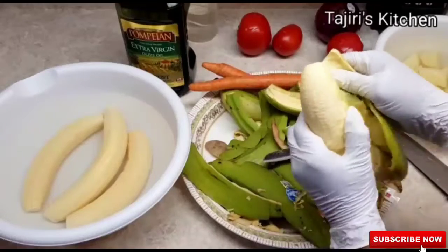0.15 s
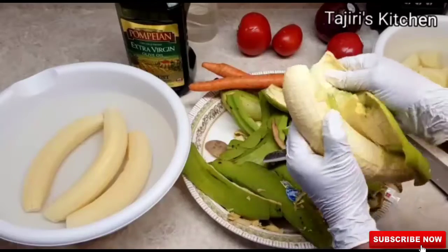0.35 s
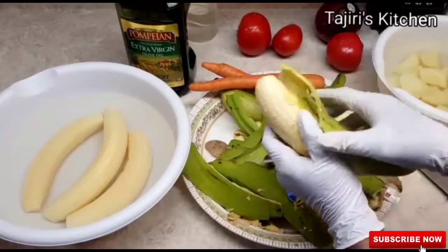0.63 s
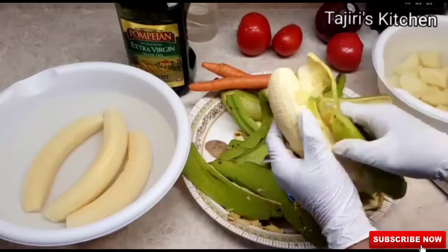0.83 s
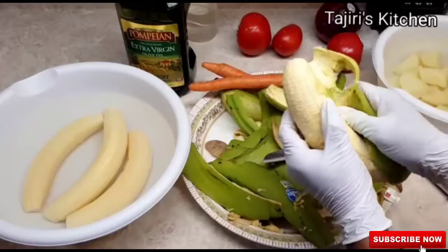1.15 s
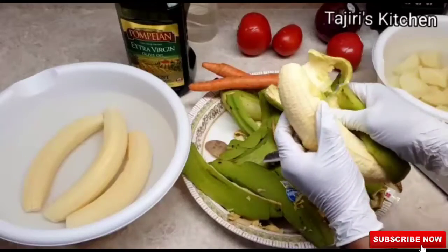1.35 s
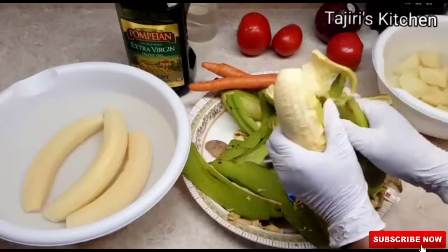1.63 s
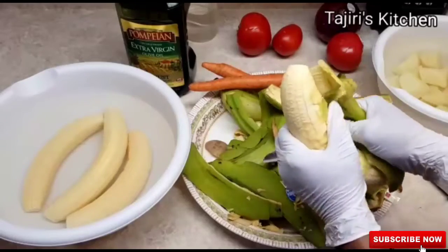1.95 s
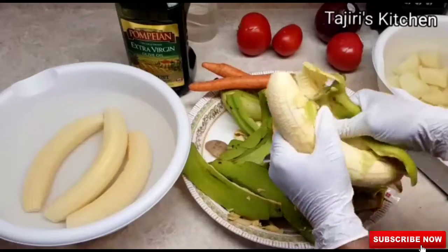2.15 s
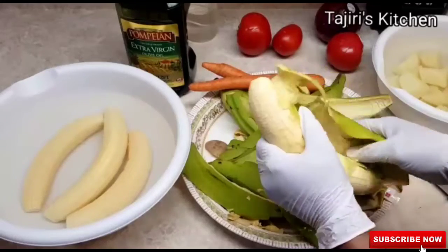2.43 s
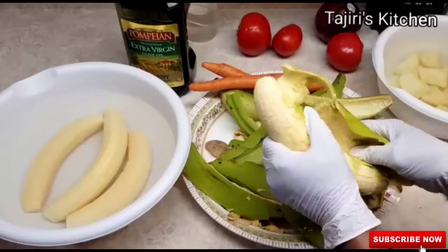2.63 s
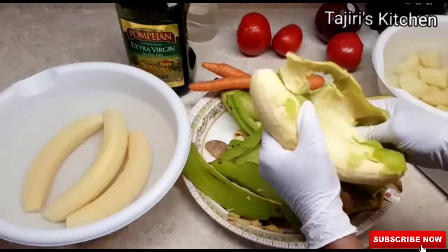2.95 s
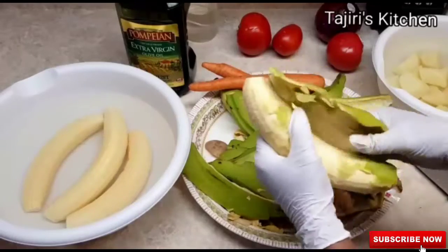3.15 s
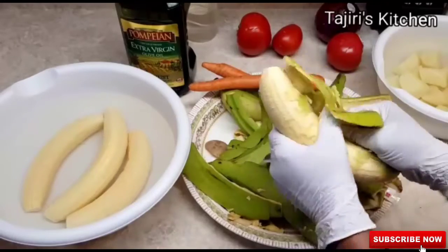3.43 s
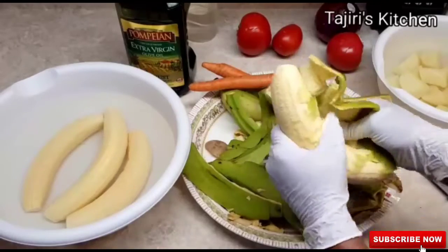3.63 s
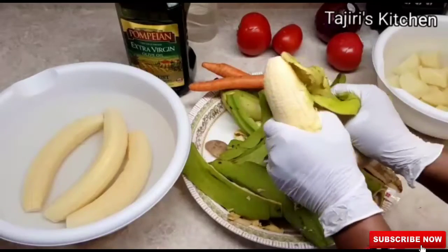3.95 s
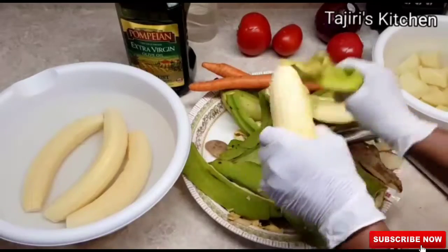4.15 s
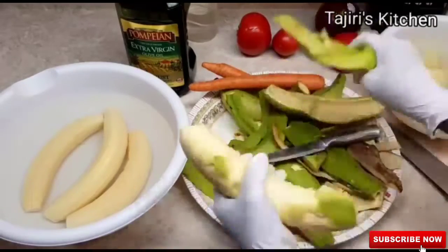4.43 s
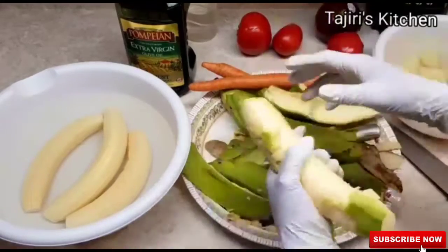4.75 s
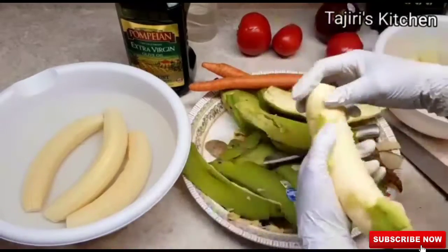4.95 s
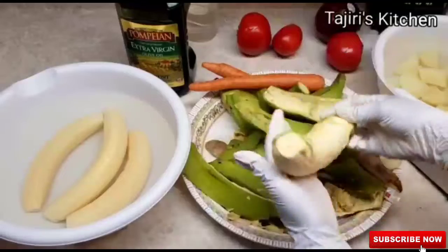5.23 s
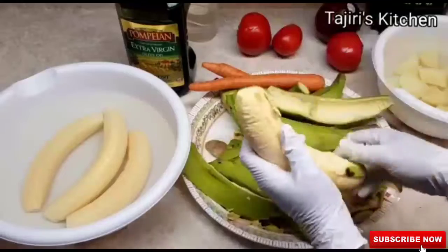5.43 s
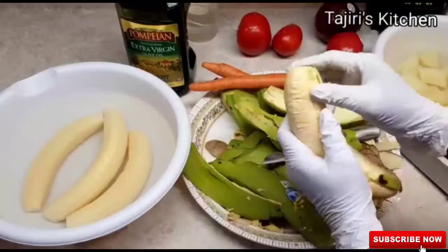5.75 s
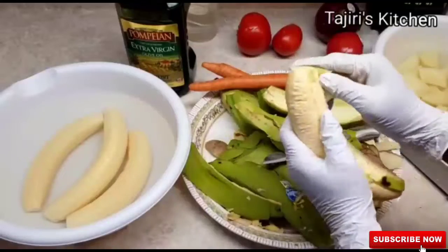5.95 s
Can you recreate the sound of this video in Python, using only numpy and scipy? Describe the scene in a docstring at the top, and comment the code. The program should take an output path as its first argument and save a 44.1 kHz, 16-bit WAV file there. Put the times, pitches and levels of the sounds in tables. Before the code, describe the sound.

Gloved hands tear the thick skin from a green plantain, close by and slightly right of centre, in a small kitchen with short echoes. A sharp snap and crackling rip come at about 0.1 seconds, followed by light glove rustle. More clusters of slightly hollow cracks and tearing fibres arrive around 1.2 to 1.4 seconds and 2.0 to 2.2 seconds. The loudest, crunchiest tear builds from 2.8 to 3.0 seconds. Loose peel then patters faintly on a plate, and further snaps with rubbing come at 3.6 and 4.2 seconds. Soft, low hand bumps follow until about 4.7 seconds. The rest is quieter, with gloves slipping and rustling on the fruit, a few tiny ticks and a brief brighter rub near 6 seconds. A wavering low hum, an uneven rumble and faint room air lie underneath throughout.

```python
"""The thick skin of a green plantain is pulled off by gloved hands, over a plate in a small kitchen.
Each pull tears fibres in a crackling run of tiny clicks; the stiff skin snaps and the pull slackens.
The gloves rustle and rub on the fruit, and loose peel knocks softly against the plate.
The skin's sounds ring in the hollow of peel, hands and plate, and the kitchen adds short echoes.
Underneath lie a low hum, an uneven rumble, soft bumps of the hands and faint room air."""
import sys
import numpy as np
from scipy import signal
from scipy.fft import rfft, irfft, next_fast_len
from scipy.io import wavfile
from scipy.ndimage import uniform_filter1d

SR = 44100
rng = np.random.default_rng(int(sys.argv[2]) if len(sys.argv) > 2 else 0)


def file_out(sig):
    """Save sig as 16-bit WAV at sys.argv[1]."""
    # one column per channel
    cols = np.atleast_2d(sig).T
    # limit, then scale
    lim = np.clip(cols, -1, 1)
    pcm = np.round(lim * 32767).astype(np.int16)
    wavfile.write(sys.argv[1], SR, pcm)


N = 269010
TIME = np.arange(N) / SR

# Levels in the tables are relative: the functions turn them up or down further.
# pulls on the skin: start t/s, length/s, rustle level/dB, peel level/dB, swell from start to end/dB
SKIN_PULLS = [(0.0, 0.12, -45, -73, -9), (0.127, 0.059, -31.5, -36, -10), (0.33, 0.065, -40, -45, 5.5),
              (0.562, 0.11, -56, -68.5, -11), (0.764, 0.14, -55.5, -73, -9), (0.948, 0.011, -49, -62, -2),
              (1.089, 0.12, -51.5, -57.5, 6.5), (1.225, 0.024, -40.5, -36.5, 8),
              (1.275, 0.15, -36, -39.5, -8), (1.448, 0.1, -53, -61, -4), (1.576, .21, -49, -64, -4),
              (1.865, 0.036, -50, -69, 8), (1.905, 0.2, -46.5, -56.5, -9),
              (2.042, 0.21, -42.5, -44.5, -14.5), (2.29, 0.12, -56.5, -56.5, -3),
              (2.414, 0.084, -45.5, -51, 3), (2.692, .07, -53, -77, -2), (2.783, 0.26, -43, -47.5, -10.5),
              (2.986, 0.021, -29, -28, 6.5), (3.033, 0.16, -58, -62, 4), (3.186, 0.069, -54.5, -59.5, 9),
              (3.389, 0.042, -48, -53.5, 3), (3.513, 0.066, -56.5, -65, 3),
              (3.597, 0.087, -38.5, -45, -4.5), (3.68, 0.073, -51, -52.5, -6),
              (3.814, 0.042, -52, -63.5, 7), (3.867, 0.257, -44, -53, 10.5),
              (4.123, 0.11, -41.5, -43.5, 10), (4.22, 0.048, -30, -32, -6), (4.652, 0.11, -57, -65, -6),
              (4.962, 0.17, -52, -68, 18), (5.198, 0.068, -56.5, -65, -5), (5.405, 0.14, -60.5, -72, 15),
              (5.814, 0.1, -64, -75.5, 2), (5.93, 0.087, -50, -71, 8.5), (6.071, .04, -41.5, -53, -1)]
# snaps of the skin: t/s, crack level/dB, crack f/Hz, splinter level/dB, splinter decay/s
SKIN_SNAPS = [(0.0395, -44.5, 2960, -31, 0.0008), (0.11, -59, 2520, -33, 0.0025),
              (0.1224, -24, 1870, -19, .006), (0.1859, -35, 2020, -33, 0.0013),
              (0.3216, -56, 1900, -38.5, .0035), (0.396, -36, 1730, -40, .001),
              (0.556, -75, 2000, -42.5, 0.0015), (0.948, -62, 2000, -37, 0.0034),
              (1.2118, -39.5, 2190, -29.5, 0.00072), (1.235, -33, 1610, -28.5, 0.0015),
              (1.2688, -37, 2000, -27, .003), (1.3056, -29.5, 1480, -32, 0.0011),
              (1.3358, -28, 1660, -30, 0.00059), (1.3751, -41, 1760, -41, .0013),
              (1.4101, -43.5, 2020, -38, .0008), (1.4598, -44, 2170, -33.5, 0.0014),
              (2.0276, -39, 2230, -31, 0.00048), (2.0426, -16, 2320, -23.5, 0.00026),
              (2.052, -31, 1920, -42, .001), (2.0999, -27.5, 1790, -34.5, .001),
              (2.1393, -38.5, 1840, -47, .001), (2.1787, -27, 2200, -31, 0.0015),
              (2.215, -52, 2430, -33.5, 0.00051), (2.2226, -55, 2040, -40, .0006),
              (2.6923, -64, 1640, -40.5, 0.00041), (2.732, -60, 1900, -40.5, 0.001),
              (2.7875, -31.5, 1450, -32.5, 0.001), (2.8264, -28.5, 2250, -24, 0.0062),
              (2.8431, -34, 1540, -44, .001), (2.89, -46, 2080, -33, .001),
              (2.9043, -26, 1620, -29, 0.0015), (2.9742, -28, 1910, -20, 0.00091),
              (2.9807, -24, 1750, -52.5, .0006), (2.9903, -27, 2110, -19, .0015),
              (3.0038, -21.5, 1550, -22, 0.0046), (3.233, -46.5, 1700, -42, .0016),
              (3.568, -58, 1800, -50, .001), (3.597, -52, 2090, -39, .0013),
              (3.6432, -28.5, 1780, -24, 0.013), (3.7324, -50.5, 1890, -44, .0007),
              (4.2061, -50, 2220, -29, .003), (4.2209, -27.5, 1760, -26.5, 0.006),
              (4.6672, -63, 2240, -46.5, .0008), (4.981, -82, 1620, -44.5, 0.0014),
              (5.0983, -62, 2520, -42, .0012), (6.0618, -56.5, 1870, -32, 0.0027)]
# skin thickness, heard as how much a snap crunches compared with its crack: t/s, level/dB
SKIN_THICKNESS = [(0.12, -22), (1.25, -4), (2.15, -16), (2.8, -3), (2.91, 3), (3.0, -1.5), (3.64, -5),
                  (4.22, -14)]
# tone of coarse fibres crunching: f/Hz, level/dB
CRUNCH_SPECTRUM = [(120, -24.5), (280, -7), (400, -8.5), (600, -3.5), (900, 1.5), (1200, 1.5),
                   (1700, -12.5), (3000, -41.5)]
# tone of the crackle as the peel lifts: f/Hz, level/dB
PEEL_SPECTRUM = [(500, -18.5), (1000, -11), (1400, 0.5), (1900, 1.5), (2500, 0), (3300, -5), (5000, -6),
                 (10000, -40.5)]
# tone of the sharp bite of a hard pull: f/Hz, level/dB
BITE_SPECTRUM = [(1200, -8), (2400, -10.5), (3300, 5.5), (4500, 1.5), (6000, -2), (9000, -15.5),
                 (16000, -23)]
# tone of the fine rustle: f/Hz, level/dB
RUSTLE_SPECTRUM = [(1000, -28), (2500, -6.5), (3500, -3), (4700, 0), (6500, 1.5), (9000, -1), (12000, 0.5),
                   (16000, -2.5)]
# gloves shifting on the fruit between pulls: t/s, level/dB
GLOVE_GRIP = [(0, -66), (0.5, -67), (0.85, -63.5), (3.3, -64), (4.5, -65), (4.87, -66.5), (5.3, -62.5),
              (5.55, -64), (5.65, -76.5), (6.1, -83)]
# glove and peel slipping on the fruit: middle t/s, length/s, level/dB, f/Hz, width/Hz
SLIPS = [(0.066, 0.17, -45.5, 3820, 1300), (0.11, 0.0077, -18.5, 3950, 1300),
         (0.172, 0.16, -45, 3840, 1600), (0.157, 0.064, -37, 1100, 500), (0.558, 0.07, -49, 5650, 1200),
         (0.775, 0.15, -55.5, 5560, 1200), (0.87, 0.21, -55, 1740, 500), (0.944, 0.017, -45.5, 5040, 700),
         (1.64, 0.13, -45.5, 4340, 900), (1.949, 0.18, -41, 2130, 710), (2.34, 0.087, -59, 2280, 500),
         (3.574, 0.13, -43.5, 1820, 450), (3.614, 0.067, -32.5, 1700, 550), (3.643, 0.046, -40, 382, 248),
         (3.867, 0.19, -46.5, 9600, 4060), (4.227, 0.1, -37, 1060, 450), (4.699, 0.12, -56.5, 2880, 900),
         (5.097, 0.081, -56, 5400, 2000), (5.116, 0.46, -65, 1580, 100), (5.155, 0.26, -55, 2500, 405),
         (5.968, 0.15, -48, 6750, 1200), (6.075, 0.04, -36, 11700, 4500)]
# loose peel knocking on the plate: t/s, level/dB
PEEL_KNOCKS = [(3.209, -57), (3.404, -53.5), (3.515, -60.5), (4.691, -58)]
# ringing of the hollow of peel, hands and plate: f/Hz, width/Hz, level/dB over the direct sound
HOLLOW_RINGS = [(426, 20, 4), (745, 24, -5), (545, 31, -8), (1190, 140, -6), (1440, 200, -13),
                (2353, 66, -5)]
# how long the kitchen's echoes take to fade by 60 dB: f/Hz, t/s
ECHO_FADE = [(200, 0.1), (800, 0.27), (2000, 0.28), (6000, 0.27), (15000, 0.23)]
# how alike the echoes are left and right: f/Hz, likeness (1 = the same)
ECHO_LIKENESS = [(100, 1), (400, 0.61), (800, 0.36), (1500, 0), (3000, 0.11), (16000, 0)]
# loudness of the low hum: t/s, level/dB
HUM_LEVEL = [(0, -56), (0.3, -40.5), (0.55, -57), (1.1, -46), (1.65, -42), (1.9, -46.5), (2.1, -64),
             (2.4, -47), (2.7, -63.5), (3.35, -54.5), (3.6, -64), (3.8, -46.5), (3.95, -51), (4.25, -49),
             (4.9, -51), (5.45, -56), (5.7, -42.5), (6.1, -50)]
# loudness of the rumble: t/s, level/dB
RUMBLE_LEVEL = [(0, -48.5), (0.7, -52.5), (1.3, -49.5), (2.9, -58.5), (3.6, -56.5), (4.3, -57), (4.9, -54),
                (5.7, -53), (6.1, -51)]
# tone of the rumble: f/Hz, level/dB
RUMBLE_SPECTRUM = [(25, -21.5), (36, -13), (48, -3.5), (65, 2), (80, 3), (100, 2.5), (130, -7.5),
                   (200, -17), (400, -46.5)]
# soft bumps of the hands: t/s, peak level/dB, f/Hz
HAND_BUMPS = [(1.598, -33.5, 58), (3.032, -43, 88), (4.232, -35, 61.4), (4.484, -34, 62),
              (4.533, -36.5, 63.6), (4.728, -32.5, 75)]
# tone of the room air: f/Hz, level/dB
AIR_SPECTRUM = [(60, 4.5), (150, -11), (240, 1), (330, -10), (500, -14.5), (1000, -17.5), (2500, -23.5),
                (6000, -41.5), (16000, -42)]


def pulling(attack_s=0.011, release_s=0.0085, after_snap_s=0.0046, slack_db=-4, slack_s=0.049):
    """Gains of crunch, peel and rustle: pulls grip and let go; snaps free fibres and slacken the pull."""
    peel, rustle, freed, slack = np.zeros((4, N))
    for s, length, rustle_db, peel_db, swell_db in SKIN_PULLS:
        age = TIME - s
        swell = from_db(swell_db * (np.clip(age / length, 0, 1) - .5))
        fade = np.exp(np.minimum(age, 0) / attack_s - np.maximum(age - length, 0) / release_s)
        power = (swell * fade) ** 2
        rustle += from_db(rustle_db) ** 2 * power
        peel += from_db(peel_db) ** 2 * power
    for s, crack_db, *_ in SKIN_SNAPS:
        at = int(s * SR)
        age = TIME[:N - at]
        freed[at:] += (from_db(crack_db) * np.exp(-age / after_snap_s)) ** 2   # fibres go on breaking
        slack[at:] = np.exp(-age / slack_s)
    tension = from_db(slack_db * slack) ** 2
    crunch = from_db(-19.5) ** 2 * peel + level(SKIN_THICKNESS) ** 2 * freed
    peel = tension * peel + from_db(-6.5) ** 2 * freed
    rustle = tension * rustle + from_db(-22) ** 2 * freed + level(GLOVE_GRIP) ** 2
    return np.sqrt([crunch, peel, rustle])


def tearing(crunch_gain, peel_gain, rustle_gain):
    """A few coarse fibres crunch and more crackle as the skin lifts; a hard pull adds a sharp bite."""
    coarse = clicks(per_s=300, spread_db=4, clump_db=-4, clumps_per_s=86)
    medium = clicks(per_s=900, spread_db=3.5, clump_db=2.5, clumps_per_s=240)
    sharp = clicks(per_s=1500, spread_db=6.5, clump_db=17.5, clumps_per_s=130)
    hardness = rustle_gain / (rustle_gain + from_db(-30))
    crunch = crunch_gain * shape_tone(coarse, CRUNCH_SPECTRUM)
    peel = peel_gain * shape_tone(medium, PEEL_SPECTRUM)
    bite = hardness * rustle_gain * shape_tone(sharp, BITE_SPECTRUM)
    return from_db(-7.5) * crunch + from_db(-3) * peel + from_db(-2) * bite


def snapping(ring_cycles=1.08, gain_db=-3):
    """Each snap makes the stiff skin swing once or twice, amid a spray of splinters."""
    lead = SR // 100   # the first fibres give way just before the skin does
    t = np.arange(-lead, SR // 30) / SR
    age = np.maximum(t, 0)
    cracks, sprays = np.zeros((2, N + len(t)))
    for s, crack_db, hz, spray_db, spray_s in SKIN_SNAPS:
        crack = np.sin(2 * np.pi * hz * age) * np.exp(-age * hz / ring_cycles)
        splinters = rng.standard_normal(len(t)) * rng.exponential(1, len(t))
        spray = splinters * np.exp(-np.abs(t) / spray_s)
        at = int(s * SR) - lead
        cracks[at:at + len(t)] += from_db(crack_db) * crack / np.linalg.norm(crack)
        sprays[at:at + len(t)] += from_db(spray_db) * spray / np.linalg.norm(spray)
    cracks = signal.sosfilt(signal.butter(2, 480, "high", fs=SR, output="sos"), cracks + 1e-18)
    sprays = signal.sosfilt(signal.butter(1, 3000, "high", fs=SR, output="sos"), sprays + 1e-18)
    return from_db(gain_db) * np.sqrt(SR / 200) * (cracks + sprays)[:N]


def rustling(gain):
    """The finest breaks blur into a rustle; each slip of a glove is a run of catches with its own pitch."""
    fine = clicks(per_s=14000, spread_db=3.5, clump_db=1.5, clumps_per_s=160)
    rustle = from_db(-3.5) * gain * shape_tone(fine, RUSTLE_SPECTRUM)
    catches = clicks(per_s=2000, spread_db=6, clump_db=4, clumps_per_s=77)
    for s, length, db, hz, width in SLIPS:
        span = slice(*np.searchsorted(TIME, [s - length / 2, s + length / 2]))
        swell = np.cos(np.pi * (TIME[span] - s) / length)
        rub = ring(ring(catches[span], hz, width), hz, 2 * width)
        rustle[span] += from_db(db - 8) * swell * rms_one(rub)
    return rustle


def knocking(decay_s=0.013):
    """A limp strip of peel meets the plate with a short, dull patter."""
    patter = sum(from_db(db) * (TIME > s) * np.exp(-np.abs(TIME - s) / decay_s) for s, db in PEEL_KNOCKS)
    return patter * rms_one(ring(rng.standard_normal(N), hz=467, width_hz=630))


def from_the_right(x, pan_db=0.2, lag_s=0.0001):
    """The hands work right of centre: the left side hears them later and softer."""
    size = next_fast_len(N + SR // 10)
    hz = np.arange(size // 2 + 1) * SR / size
    late = irfft(rfft(x, size) * np.exp(-2j * np.pi * hz * lag_s), size)[:N]
    return np.array([late * from_db(-pan_db), x * from_db(pan_db)])


def kitchen(x, spots=6):
    """The sound wanders between spots on the moving fruit, each with its own echoes."""
    shares = from_db(12 * np.array([drift(45) for _ in range(spots)]))
    shares /= np.linalg.norm(shares, axis=0)
    return sum(signal.fftconvolve((x * share)[None], echoes(), axes=1)[:, :N] for share in shares)


def echoes(near_db=3, near_s=0.0053, far_db=-4):
    """Echoes of one spot: counter and bowls scatter the treble at once; the walls add a short tail."""
    t = np.arange(SR // 3) / SR
    edges, response = np.geomspace(80, 17000, num=13), 0
    noise = rng.standard_normal((2, 2, len(t)))
    near = np.exp(-t / near_s) * (t > .0007)
    for k, (low, high) in enumerate(zip(edges, edges[1:])):
        hz = np.sqrt(low * high)
        far = from_db(-60 * t / at_hz(ECHO_FADE, hz)) * (t > .006)
        scatter = from_db(near_db) * hz / (hz + 500)   # long waves pass round small things
        decay = np.hypot(scatter * near / np.linalg.norm(near), from_db(far_db) * far / np.linalg.norm(far))
        band = signal.butter(2, [low, high], "band", fs=SR, output="sos")
        mid, side = signal.sosfilt(band, noise[k % 2] * decay)
        alike = at_hz(ECHO_LIKENESS, hz)
        response += np.sqrt((1 + alike) / 2) * mid + np.sqrt((1 - alike) / 2) * side * [[1], [-1]]
    return response


def hand_bumps(length_s=0.023):
    """Each bump of the hands is a low note that swells and dies quickly."""
    bumps = np.zeros(N)
    for s, db, hz in HAND_BUMPS:
        age = np.clip(TIME - s, 0, 1)
        rise = 2 * age / length_s
        bumps += from_db(db) * np.sin(2 * np.pi * hz * age) * rise * np.exp(1 - rise)
    return bumps


def hum(hz=57.5, waver_rad=0.79, swell_db=2):
    """One low note wavers in pitch and loudness."""
    phase = 2 * np.pi * hz * TIME + waver_rad * drift(16)
    gain = from_db(-1 + swell_db * drift(12)) * level(HUM_LEVEL)
    return gain * np.sqrt(2) * np.sin(phase)


def rumble_and_air(flutter_db=3, air_db=-60.5):
    """A deep noise flutters unevenly beside the faint, steady rush of room air."""
    rumble = stereo_noise(RUMBLE_SPECTRUM, side_db=-15)
    air = stereo_noise(AIR_SPECTRUM, side_db=-6)
    gain = from_db(1.5 + flutter_db * drift(11)) * level(RUMBLE_LEVEL)
    return gain * rumble + from_db(air_db) * air


def stereo_noise(spectrum, side_db):
    """Noise in the middle, widened by a second noise added left and taken away right."""
    mid, side = (shape_tone(rng.standard_normal(N), spectrum) for _ in range(2))
    return mid + from_db(side_db) * side * [[1], [-1]]


def clicks(per_s, spread_db, clump_db, clumps_per_s):
    """Tiny breaks of uneven size that come in clumps; their power is evened out over 25 ms."""
    sizes = from_db(spread_db * np.minimum(rng.exponential(1, N), 4)) * rng.choice([-1, 1], N)
    happens = rng.random(N) < per_s / SR
    breaks = sizes * happens * from_db(clump_db * drift(clumps_per_s))
    power = np.maximum(uniform_filter1d(breaks ** 2, size=SR // 40), 0)
    return breaks / np.sqrt(power + 1e-6)


def ring(x, hz, width_hz):
    """Keep a band around one pitch; the narrower it is, the longer it rings."""
    r = np.exp(-np.pi * width_hz / SR)
    feedback = [1, -2 * r * np.cos(2 * np.pi * hz / SR), r * r]
    return signal.lfilter(np.array([1, 0, -1]) * (1 - r * r) / 2, feedback, x + 1e-18)


def shape_tone(x, spectrum):
    """Give a sound the tone in a table, with no ringing ahead of a click (minimum phase)."""
    size = 2 ** 13
    gains = from_db(at_hz(spectrum, np.arange(size // 2 + 1) * SR / size))
    cepstrum = irfft(np.log(gains))
    response = irfft(np.exp(rfft(2 * cepstrum[:size // 2], size)))
    return rms_one(signal.fftconvolve(x, response)[:N])


def drift(per_s):
    """A random wander of typical size 1."""
    points = rng.standard_normal(2 ** 13)
    return rms_one(np.interp(TIME * per_s, np.arange(len(points)), points))


def at_hz(rows, hz):
    """Read between the rows of a table, with octaves evenly spaced."""
    known_hz, values = np.transpose(rows)
    return np.interp(np.log(hz + 1e-9), np.log(known_hz), values)


def level(rows):
    """Gain over time from rows of t/s, level/dB."""
    return from_db(np.interp(TIME, *np.transpose(rows)))


def rms_one(x):
    """Scale a signal to an average power of 1."""
    return x / np.sqrt(np.mean(x ** 2) + 1e-20)


def from_db(db):
    """Turn decibels into a gain."""
    return 10 ** (np.asarray(db) / 20)


def scene():
    """The skin's sounds ring in the hollow under the hands, which partly block the direct rustle."""
    crunch_gain, peel_gain, rustle_gain = pulling()
    skin = tearing(crunch_gain, peel_gain, rustle_gain) + snapping() + knocking()
    skin = skin + sum(from_db(db) * ring(skin, hz, width) for hz, width, db in HOLLOW_RINGS)
    rustle = rustling(rustle_gain)
    direct = from_the_right(skin + from_db(-5) * rustle)
    room = kitchen(skin + from_db(2.5) * rustle)
    return direct + room + hand_bumps() + hum() + rumble_and_air()


def record(dry):
    """The treble above 15900 Hz is cut steeply."""
    return signal.sosfilt(signal.ellip(12, .1, 80, 15900, fs=SR, output="sos"), dry)


dry = scene()
out = record(dry)
file_out(out)
```